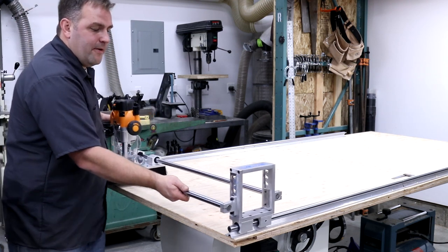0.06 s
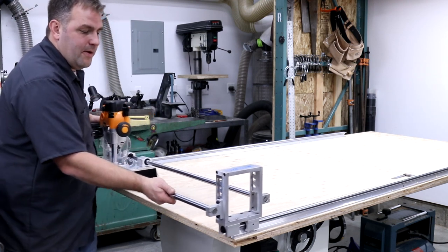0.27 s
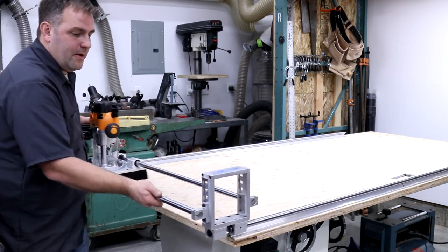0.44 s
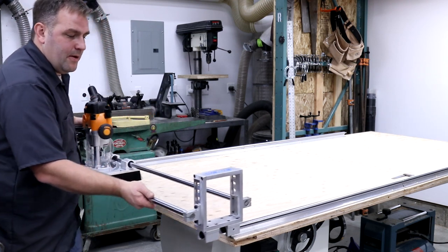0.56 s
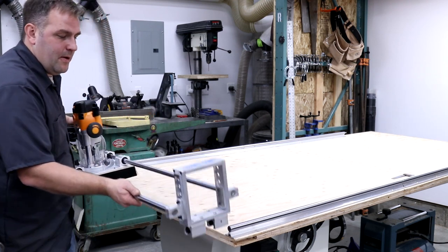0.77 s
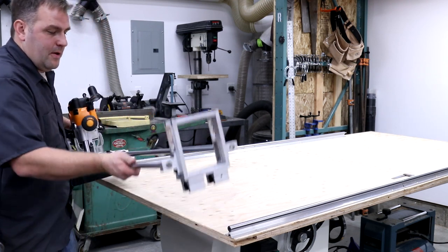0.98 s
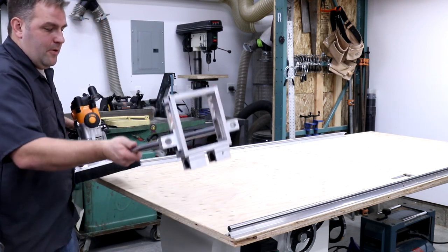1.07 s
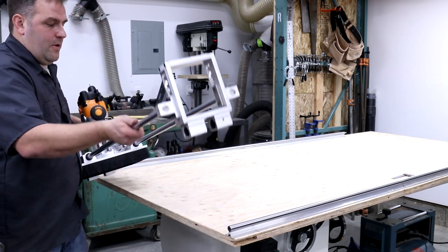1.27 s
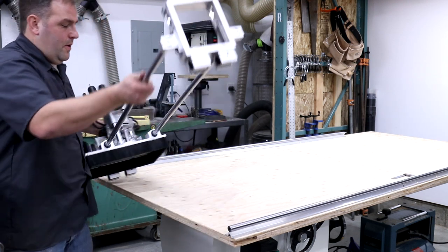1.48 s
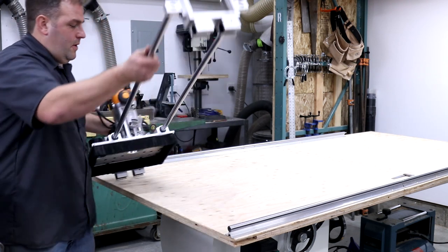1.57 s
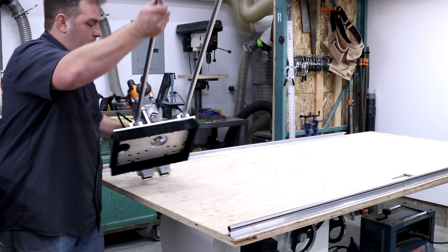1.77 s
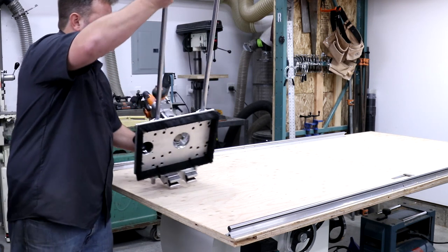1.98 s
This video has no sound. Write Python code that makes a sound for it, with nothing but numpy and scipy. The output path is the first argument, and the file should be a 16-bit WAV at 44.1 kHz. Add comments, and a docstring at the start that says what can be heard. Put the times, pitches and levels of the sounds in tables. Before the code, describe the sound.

Metal frame drags and bumps over wood, then a carriage runs down its rods into one rattling knock

```python
"""A router carriage on two steel rods is dragged off a plywood bench in a woodworking shop; a faint
higher mode of the rods, a sine, sings throughout. The frame scrapes, judders once and bumps over the
sheet: noise grains and force pulses drive resonances. The rods hum, a sine of gliding pitch, as it lifts
clear. Tilted up, the carriage runs along the rods on its bearings: patter through a moving resonance.
It meets the end stop with one rattling knock: a cluster of pulses that clatters and rings on."""
import sys
import numpy as np
from scipy import signal
from scipy.fft import rfft, irfft
from scipy.io import wavfile

SR = 44100
rng = np.random.default_rng(int(sys.argv[2]) if len(sys.argv) > 2 else 0)


def int16_out(signal):
    """Quantize to a 16-bit WAV file."""
    q = np.round(np.clip(np.atleast_2d(signal).T, -1, 1) * 32767)
    wavfile.write(sys.argv[1], SR, q.astype(np.int16))


N = 89522
TIME = np.arange(N) / SR
STOP_S = 1.44  # the carriage stands still from here on

# frame pressure on the plywood: (time [s], relative level [dB])
DRAG_PRESSURE = [(0, -44.5), (.1, -45), (.195, -43), (.25, -44.5), (.3, -40), (.37, -41.5), (.46, -45),
                 (.505, -42), (.56, -50.5), (.59, -51.5), (.63, -48.5), (.68, -63), (.72, -74), (.79, -79),
                 (.85, -100)]
# carriage speed on the rods: (time [s], relative level [dB])
RUN_SPEED = [(.78, -87.5), (.83, -61.5), (.88, -49.5), (.95, -44.5), (1.02, -41), (1.085, -42.5),
             (1.13, -52.5), (1.2, -89), (1.26, -67), (1.43, -62)]
# sheet resonances: (frequency [Hz], relative level [dB], t60 [s])
SHEET_MODES = [(88, -6, .3), (116, -7, .14), (150, -2, .13), (178, -6, .13), (270, -3, .1), (297, -4, .18),
               (435, -1, .1), (587, -2, .18), (653, 0, .16), (942, -2, .15), (1080, -1, .15),
               (1253, -4, .22)]


def from_db(db):
    """Decibels to gain."""
    return 10 ** (np.asarray(db) / 20)


def rms_one(x):
    """Scale to rms 1."""
    return x / np.sqrt(np.mean(x ** 2) + 1e-20)


def unit_energy(x):
    """Scale a response to energy 1."""
    return x / np.sqrt(np.sum(x ** 2) + 1e-20)


def in_time(rows):
    """Each column of a curve, interpolated sample by sample."""
    time_s, *columns = np.transpose(rows)
    return [np.interp(TIME, time_s, column) for column in columns]


def at_hz(points, hz):
    """Read a table on a log-frequency axis."""
    table_hz, value = np.transpose(points)
    return np.interp(np.log(hz + 1), np.log(table_hz), value)


def through(x, response):
    """Pass a sound through an impulse response."""
    return signal.fftconvolve(x, response)[:N]


def high_pass(x, order, hz):
    """Butterworth high-pass."""
    return signal.sosfilt(signal.butter(order, hz, "high", fs=SR, output="sos"), x)


def band_pass(x, low_hz, high_hz):
    """Butterworth band-pass."""
    return signal.sosfilt(signal.butter(2, [low_hz, high_hz], "band", fs=SR, output="sos"), x)


def colour(points):
    """Minimum-phase response of energy 1 with the given spectrum."""
    size = 8192
    hz = np.arange(size // 2 + 1) * SR / size
    cepstrum = irfft(np.log(from_db(at_hz(points, hz))))
    # fold the cepstrum to its causal half
    cepstrum[1:size // 2] *= 2
    cepstrum[size // 2 + 1:] = 0
    return unit_energy(irfft(np.exp(rfft(cepstrum))))


def ringing(modes):
    """Response of energy 1 from decaying sines; dB sets each one's share of energy."""
    total = np.zeros(N)
    for hz, db, t60_s in modes:
        decay = from_db(db - 60 * TIME / t60_s) / np.sqrt(t60_s)
        total += decay * np.sin(2 * np.pi * hz * TIME)
    return unit_energy(total)


def dense_ring(t60_s):
    """The many close modes of a plate: dying noise, spectrum flattened, then tapered; energy 1."""
    decay = from_db(-60 * TIME / t60_s)
    spectrum = rfft(rng.standard_normal(N) * decay)
    flat = irfft(spectrum / np.abs(spectrum), N)
    return unit_energy(flat * decay ** .25)


def grains(per_s, spread_db):
    """Random tiny collisions of uneven size and sign, rms 1."""
    size_db = spread_db * np.minimum(rng.exponential(1, N), 4)
    sizes = from_db(size_db) * rng.choice([-1, 1], N)
    return rms_one(sizes * (rng.random(N) < per_s / SR))


def waver(per_s, depth_db):
    """A gain wandering between random levels; depth is their standard deviation."""
    return from_db(depth_db * np.interp(TIME * per_s, np.arange(2000), rng.standard_normal(2000)))


def contacts(rows):
    """One low-passed force pulse per row; each row's cut-off sets how dull its contact sounds."""
    force = np.zeros(N)
    for time_s, db, cutoff_hz in rows:
        click = np.full(N, 1e-18)  # tiny bias keeps the filter out of denormals
        click[int(time_s * SR)] = from_db(db)
        force += signal.lfilter(*signal.butter(1, min(cutoff_hz, SR / 3), fs=SR), click)
    return force


def gliding_resonance(x, hz, width_hz):
    """A two-pole resonance whose centre moves block by block."""
    radius = np.exp(-np.pi * width_hz / SR)
    out, state, block = np.zeros(N), np.zeros(2), 128
    for i in range(0, N, block):
        w = 2 * np.pi * hz[i] / SR
        gain = np.sqrt(2 * (1 - radius * radius)) * np.sin(w)
        poles = [1, -2 * radius * np.cos(w), radius * radius]
        out[i:i + block], state = signal.lfilter([gain], poles, x[i:i + block], zi=state)
    return out


def clatter(blow, split_hz, t60_s, scatter_db):
    """The thump of each blow is direct; its treble scatters among the close modes of the body."""
    thump = signal.sosfilt(signal.butter(1, 1200, fs=SR, output="sos"), blow)
    treble = high_pass(blow, 2, split_hz)
    return thump + from_db(scatter_db) * through(treble, dense_ring(t60_s))


def shop(x, wet_db):
    """Direct sound plus a diffuse tail: noise bands, each with its own decay."""
    # shop decay: (frequency [Hz], t60 [s])
    shop_t60 = [(130, 0.75), (400, 0.63), (1500, 0.52), (5000, 0.72), (14000, 0.25)]
    edges_hz = np.geomspace(45, 18000, 10)
    tail, white = np.zeros(N), rng.standard_normal((2, N))
    for k, (low_hz, high_hz) in enumerate(zip(edges_hz, edges_hz[1:])):
        t60_s = at_hz(shop_t60, np.sqrt(low_hz * high_hz))
        tail += band_pass(white[k % 2], low_hz, high_hz) * from_db(-60 * TIME / t60_s)
    onset = np.minimum(TIME / 0.0069, 1)
    return x + from_db(wet_db) * through(x, unit_energy(tail * onset))


def air():
    """Quiet shop air: steady coloured noise."""
    # air spectrum: (frequency [Hz], relative level [dB])
    air_colour = [(25, -15), (50, -9), (80, 5), (150, 4), (260, 4), (600, -2), (1300, -5.5), (2500, -15.5),
                  (6000, -23.5), (15000, -25.5)]
    return from_db(-68) * through(rng.standard_normal(N), colour(air_colour))


def shudder():
    """The rods shudder under the running carriage: a low rumble swells and dies."""
    # rumble spectrum: (frequency [Hz], relative level [dB])
    shudder_colour = [(50, -33), (90, -21), (120, 5.5), (155, -0.5), (190, -7), (250, -17.5), (400, -37),
                      (2000, -64)]
    start_s, rise_s, t60_s, level_db = 1.06, 0.063, 0.7, -50.5
    age_s = np.maximum(TIME - start_s, 0)
    level = np.minimum(age_s / rise_s, 1) * from_db(level_db - 60 * age_s / t60_s)
    return through(rng.standard_normal(N) * level, colour(shudder_colour))


def rods():
    """The long rods flex with a low hum of gliding pitch; a faint higher mode sings throughout."""
    # flexing: (time [s], pitch [Hz], level [dB])
    flex = [(.5, 89, -83), (.58, 87.8, -50), (.72, 86.9, -59.5), (.9, 85.9, -56), (1.02, 81.4, -65.5),
            (1.1, 81.8, -72), (1.3, 79.7, -64.5), (1.45, 85.3, -63), (1.65, 80.2, -63.5), (1.8, 79.7, -79),
            (2.03, 82.4, -86)]
    # higher mode: (time [s], level [dB])
    sing_level = [(.7, -72.5), (1.35, -70), (1.9, -75.5)]
    sing_hz = 239.4
    flex_hz, flex_db = in_time(flex)
    hum = np.sin(2 * np.pi * np.cumsum(flex_hz) / SR)
    hum = hum * from_db(flex_db) * waver(per_s=28, depth_db=3.0)
    sing = np.sin(2 * np.pi * sing_hz * TIME)
    sing = sing * from_db(in_time(sing_level)[0]) * waver(per_s=10, depth_db=0.5)
    return np.sqrt(2) * (hum + sing)  # sine levels are rms


def ticks():
    """Grit snaps and loose metal parts touch; the smaller the part, the higher its tick."""
    # ticks: (time [s], relative level [dB], high-pass corner [Hz])
    tick_rows = [(.2158, -33, 2800), (0.331, -32, 7000), (0.463, -28.5, 6000), (0.49, -27, 7000),
                 (0.5217, -27, 1500), (0.619, -37, 5000), (0.8188, -44.5, 2430), (1.022, -30.5, 1510),
                 (1.103, -27, 2000), (1.179, -36.5, 1500), (1.892, -55, 2520)]
    # tick spectrum: (frequency [Hz], relative level [dB])
    tick_colour = [(300, 8), (1200, -14), (2500, 15), (5000, 8.5), (7500, -13), (15000, -12.5)]
    clicks = np.zeros(N)
    for time_s, db, low_hz in tick_rows:
        clicks += high_pass(contacts([(time_s, db, SR / 3)]), 2, min(low_hz, SR / 3))
    return through(through(clicks, colour(tick_colour)), dense_ring(t60_s=0.017))


def crackle(rubbing_db, offset_db):
    """Splinters under the frame or grit in the bearings: sparse bright snaps that follow the rubbing."""
    # snap spectrum: (frequency [Hz], relative level [dB])
    crackle_colour = [(800, -41), (2500, -9), (4500, -5), (7000, -4), (11000, -2), (15000, -17)]
    snaps = grains(per_s=450, spread_db=2.0) * from_db(rubbing_db + offset_db)
    return through(snaps, colour(crackle_colour))


def scuffs():
    """Parts catch briefly: each scuff is a short swell of grains in one band."""
    # scuffs: (time [s], half-length [s], level [dB], centre [Hz], width [octaves])
    scuff_rows = [(0.498, 0.011, -42.5, 960, 0.6), (0.527, .007, -40.5, 616, 1.26),
                  (0.676, 0.018, -49, 670, 1.1), (1.029, 0.0091, -51.5, 1820, 0.54),
                  (1.079, 0.03, -51.5, 368, 1.09), (1.175, 0.036, -60.5, 1800, .9)]
    total = np.zeros(N)
    for time_s, half_s, db, hz, octaves in scuff_rows:
        half_width = 2 ** (octaves / 2)
        rub = band_pass(grains(per_s=5300, spread_db=1.5), hz / half_width, hz * half_width)
        swell = np.exp(-((TIME - time_s) / half_s) ** 2 / 2)
        total += from_db(db) * swell * rms_one(rub)
    return total


def judder():
    """The frame judders once: a short run of uneven stick-slip jerks."""
    # jerk spectrum: (frequency [Hz], relative level [dB])
    judder_colour = [(100, -39), (400, 4.5), (1050, 9), (1600, -1), (2600, -23), (3600, -18), (5000, -45),
                     (15000, -54)]
    start_s, length_s, edge_s = .207, .029, 0.00074
    slips_per_s = 450 * waver(per_s=480, depth_db=3.0)
    slips = np.diff(np.floor(np.cumsum(slips_per_s) / SR), prepend=0)
    gate = np.clip(np.minimum(TIME - start_s, start_s + length_s - TIME) / edge_s, 0, 1)
    return from_db(-38.5) * through(rms_one(slips) * gate, colour(judder_colour))


def bumps():
    """The frame drops on the edge of the sheet: force pulses clatter and ring its modes."""
    # bumps: (time [s], relative level [dB], contact cut-off [Hz])
    bump_rows = [(.5195, -11.5, 1480), (.5274, -11, 1500), (.5335, -15, 1100), (.543, -7.5, 307),
                 (.5895, -7.5, 99)]
    # bump spectrum: (frequency [Hz], relative level [dB])
    bump_colour = [(40, -19), (90, 4.5), (160, 3.5), (260, 7.5), (370, 2), (480, 8.5), (700, -0.5),
                   (1100, -3), (3000, -28.5), (15000, -38)]
    force = contacts(bump_rows)
    thud = clatter(through(force, colour(bump_colour)), split_hz=400, t60_s=.055, scatter_db=-0.5)
    return from_db(-1.0) * thud + from_db(-2.5) * through(force, ringing(SHEET_MODES))


def drag():
    """The frame catches on the wood grain: friction grains scrape and ring the sheet, the load booms."""
    # scrape spectrum: (frequency [Hz], relative level [dB])
    drag_colour = [(55, -51), (100, -14), (160, 8), (260, -1), (600, -0.5), (1100, -3.5), (2000, -7.5),
                   (3200, -18), (5000, -26.5), (7500, -37.5), (15000, -44.5)]
    # boom of the loaded sheet: (time [s], relative level [dB])
    boom_level = [(0, -82), (.12, -73), (.2, -53), (.27, -47), (.37, -47.5), (.47, -50), (.53, -39.5),
                  (.6, -48), (.68, -52), (.74, -57.5), (.85, -95)]
    # boom spectrum: (frequency [Hz], relative level [dB])
    boom_colour = [(40, -38.5), (62, -30), (88, -4.5), (125, -3.5), (160, -1.5), (220, -10.5), (400, -9.5),
                   (800, -21.5), (3000, -80.5)]
    pressure = from_db(in_time(DRAG_PRESSURE)[0] - 3)
    friction = grains(per_s=5000, spread_db=2.5) * waver(per_s=66, depth_db=0.75) * pressure
    load = grains(per_s=900, spread_db=3.0) * from_db(in_time(boom_level)[0] - 0.5)
    scrape = through(friction, colour(drag_colour))
    sheet = from_db(-15.5) * through(friction, ringing(SHEET_MODES))
    return scrape + sheet + through(load, colour(boom_colour))


def carriage():
    """Bearing balls patter along the rods; one resonance slides and wakes the rod modes in turn."""
    # patter spectrum: (frequency [Hz], relative level [dB])
    run_colour = [(100, -14), (450, -10.5), (680, 1), (1000, -0.5), (1500, -3.5), (2000, -6), (3000, -17.5),
                  (4800, -23), (7000, -37.5), (15000, -43)]
    # rod and carriage resonances: (frequency [Hz], relative level [dB], t60 [s])
    rail_modes = [(680, -1, .12), (824, -3, .12), (942, -2, .12), (1005, -1, .1), (1085, -1, .12),
                  (1197, -3, .12), (1426, 3, .18), (1518, -1, .12), (1905, -1, .12), (2005, -1, .12)]
    # main resonance, sinking as the carriage travels: (time [s], centre [Hz])
    sweep = [(.85, 1540), (1.01, 1590), (1.045, 1090), (1.085, 935), (1.14, 790)]
    speed = waver(per_s=130, depth_db=1.5) * from_db(in_time(RUN_SPEED)[0] - 4.0) * (TIME < STOP_S)
    balls = grains(per_s=5000, spread_db=2.0) * speed
    patter = grains(per_s=5000, spread_db=3) * speed
    glide = high_pass(gliding_resonance(patter, in_time(sweep)[0], width_hz=650), 3, 600)
    run = from_db(-2.0) * through(balls, colour(run_colour))
    rails = from_db(-17) * through(glide, ringing(rail_modes))
    return run + rails + from_db(-5.5) * glide


def knock():
    """The carriage meets the stop in a quick cluster of contacts; the frame clatters and rings on."""
    # contacts: (time [s], relative level [dB], contact cut-off [Hz])
    knock_rows = [(1.4375, -18.5, 2540), (1.4432, -14.5, 1080), (1.4505, -15.5, 4500),
                  (1.4592, -12.5, 1400), (1.4632, -12.5, 1800), (1.4697, -11, 910), (1.4895, -11, 180),
                  (1.4978, -9, 256), (1.5145, -22.5, 1210)]
    # blow spectrum: (frequency [Hz], relative level [dB])
    knock_colour = [(40, -28), (80, -10), (130, 3.5), (250, 5), (550, -2.5), (1200, 0), (1850, -6),
                    (2900, -13), (4200, -15), (7000, -26.5), (15000, -29)]
    # stop and frame resonances: (frequency [Hz], relative level [dB], t60 [s])
    stop_modes = [(118, -2, .3), (147.7, 6, 0.078), (243, -8, 0.14), (345, 1, 0.68), (448.4, 0, 0.32),
                  (510, 8.5, 0.13), (675, -3.5, 0.091), (900, -32, 0.45), (948, -13, 0.15),
                  (1140, -0.5, 0.16), (1254, -14, .28), (1462, 0, 0.25), (1714, -15, 0.32),
                  (2390, -13, 0.092)]
    force = contacts(knock_rows)
    blow = through(force, colour(knock_colour))
    rattle = from_db(-1.0) * clatter(blow, split_hz=490, t60_s=0.092, scatter_db=0.5)
    body = from_db(-6.5) * through(blow, dense_ring(t60_s=0.63))
    ring = from_db(-0.5) * through(force, ringing(stop_modes))
    return rattle + body + ring


def scene():
    """All sources over the shop air; bench, rails and knock also excite the shop."""
    splinters = crackle(in_time(DRAG_PRESSURE)[0], offset_db=-35.5)
    grit = crackle(in_time(RUN_SPEED)[0], offset_db=-37.5) * (TIME < STOP_S)
    bench = shop(drag() + judder() + bumps() + scuffs() + splinters, wet_db=-6.5)
    rails = shop(carriage() + ticks() + grit, wet_db=-6.5)
    stop = shop(knock(), wet_db=-11)
    return (air() + shudder() + rods() + bench + rails + stop)[None]


def record(dry):
    """Cut the deep bass and the top."""
    dry = high_pass(dry, 5, 62)
    return signal.sosfilt(signal.ellip(10, .1, 70, 15550, fs=SR, output="sos"), dry)


dry = scene()
out = record(dry)
int16_out(out)
```